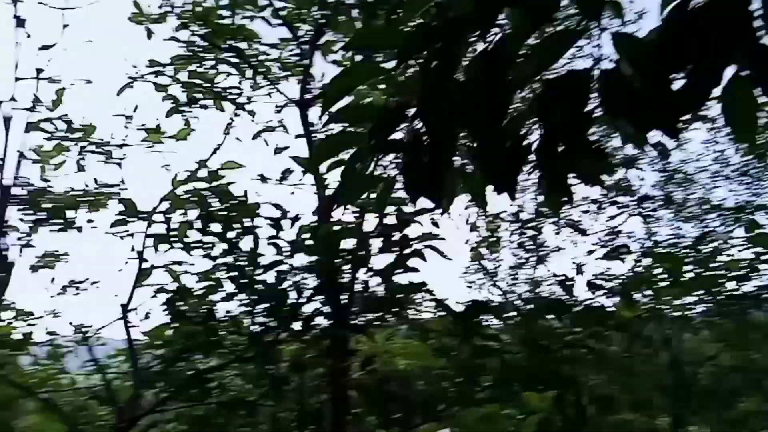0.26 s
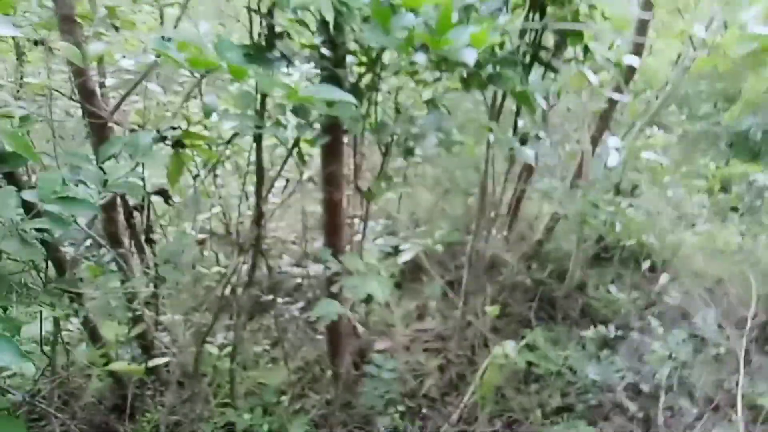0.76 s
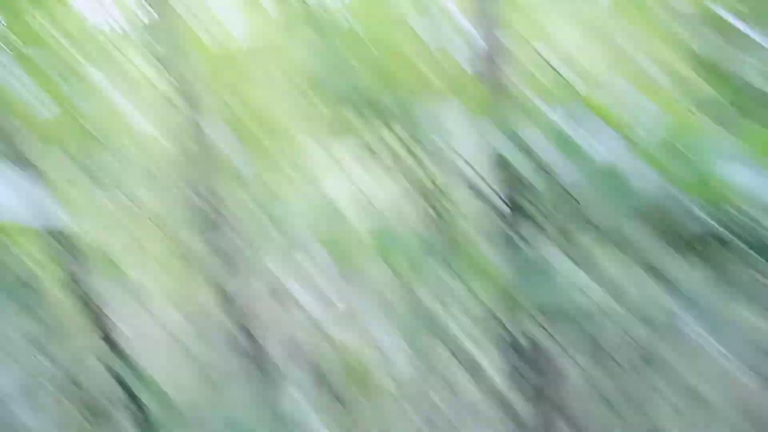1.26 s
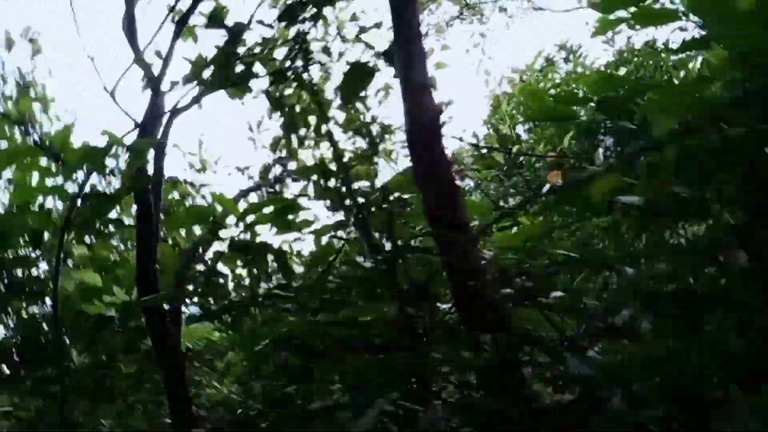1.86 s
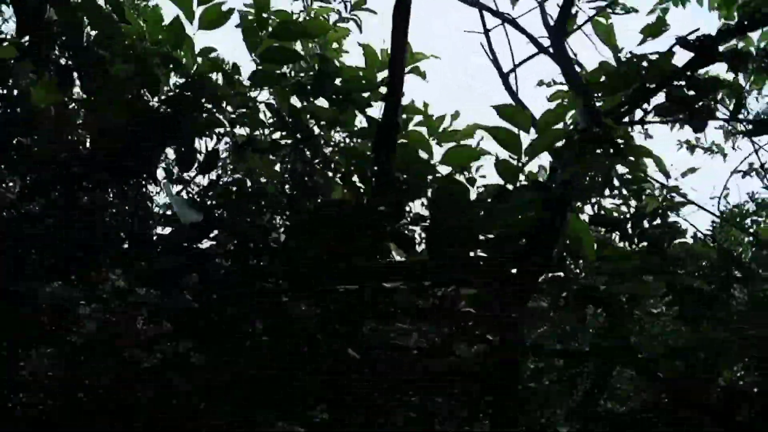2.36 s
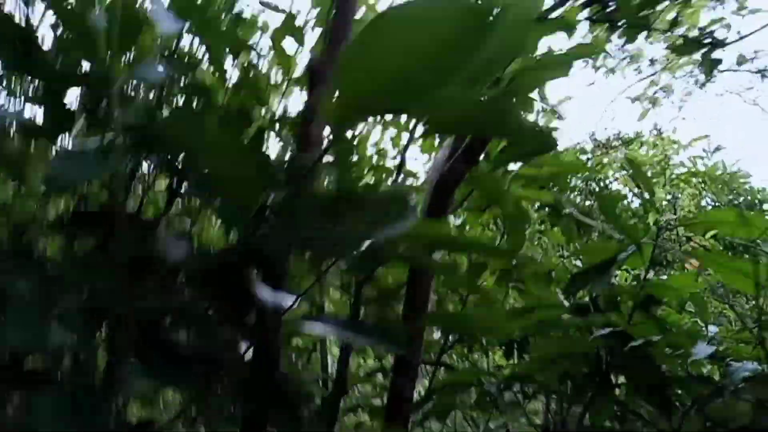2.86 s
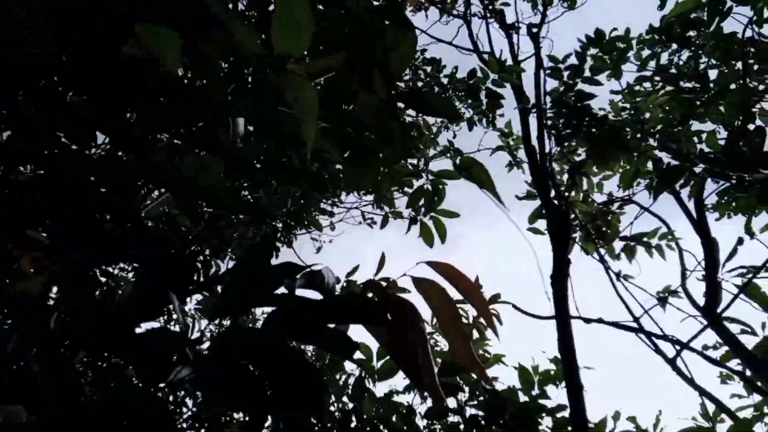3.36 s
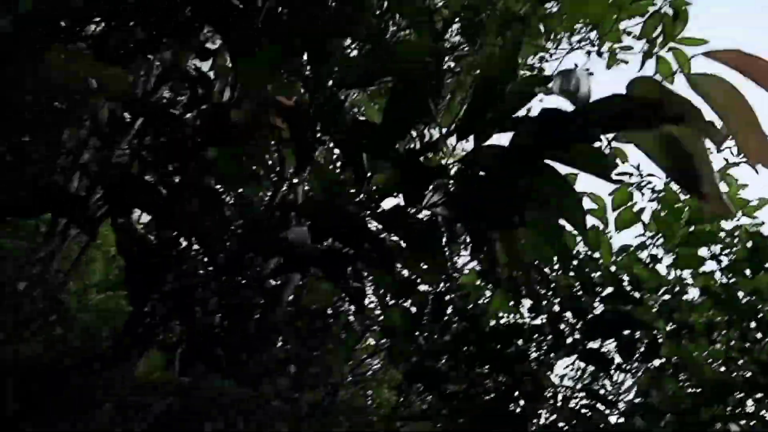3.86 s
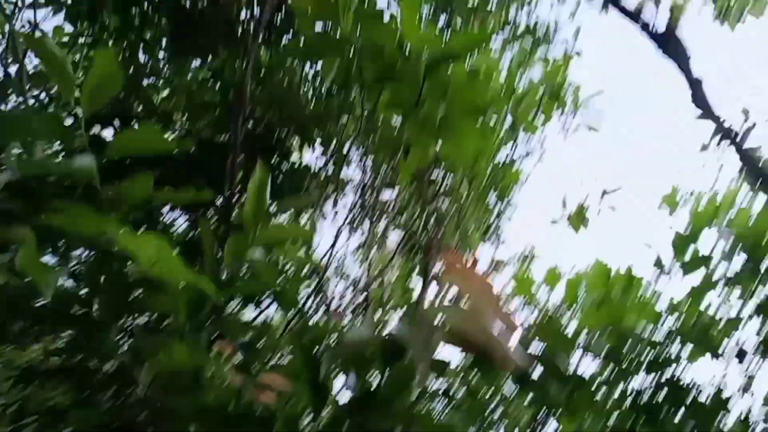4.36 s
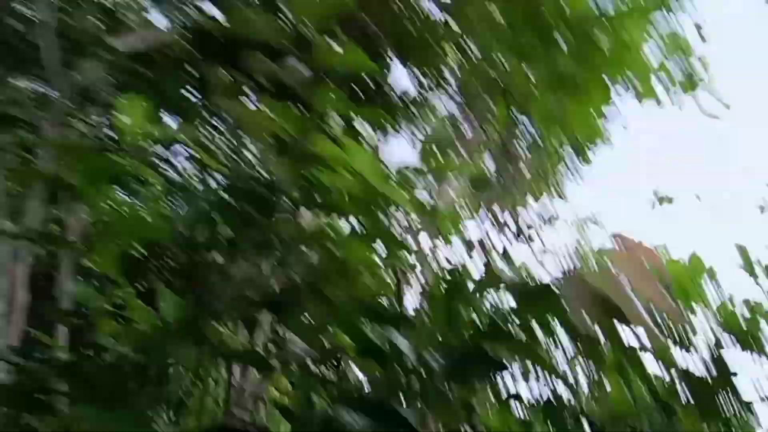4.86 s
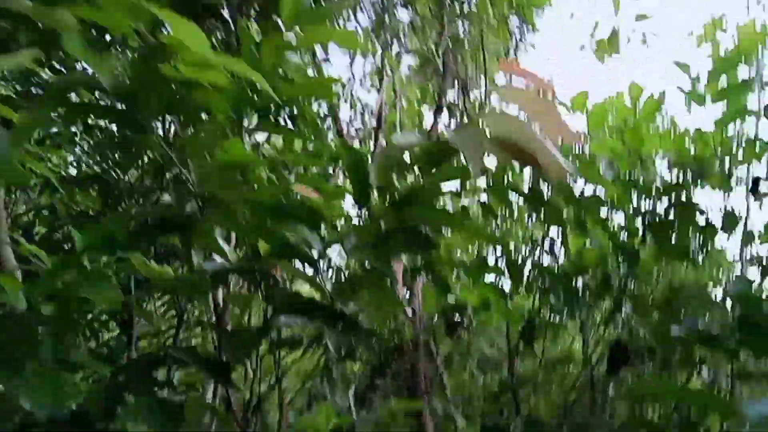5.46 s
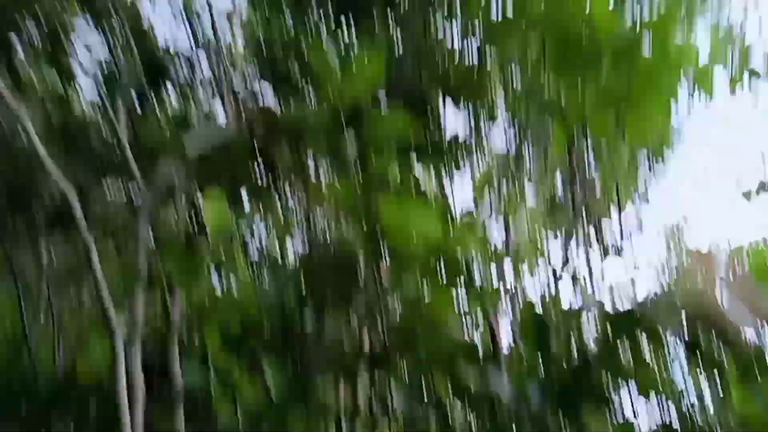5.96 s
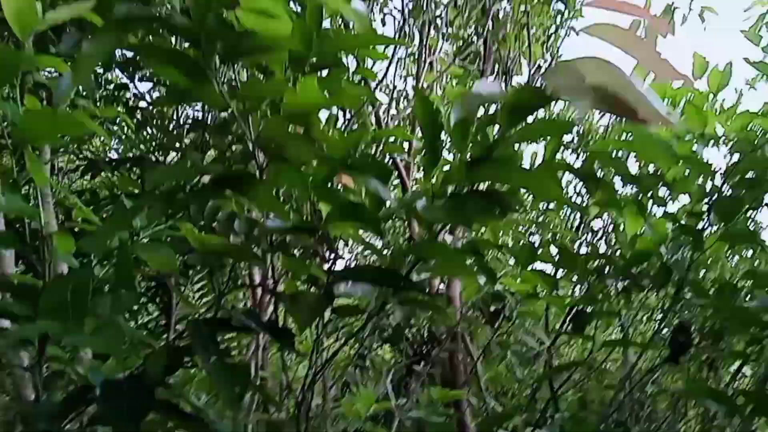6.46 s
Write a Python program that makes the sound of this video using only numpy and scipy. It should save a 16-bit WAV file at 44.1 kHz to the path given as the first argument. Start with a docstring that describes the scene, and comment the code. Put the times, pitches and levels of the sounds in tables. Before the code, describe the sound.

From 0 s, someone pushes through dry undergrowth right beside the microphone. Leaves brush past in soft, crackly sweeps, and twigs snap at 0.3 and 0.6 s. The heaviest crunch comes at about 0.75-0.9 s with a hard crack, followed by sharp snaps near 1.1 s and smaller ones at 1.3-1.9 s. Faint pure whistles sound far off at 1.0 and 1.45 s, then quick soft hoots from 1.7 s as a thin insect buzz starts pulsing. At 2.1 s a close bird gives a brief raspy, downward chirp. After a snap at 2.4 s, movement becomes quiet rustling. Faint chirps chatter around 2.9-3.2 s; whistles return at 3.5 and 4.0 s. The raspy call repeats at 4.3 s, then a twig snaps at 4.5 s and another, weaker, at 4.8 s. Light stirring, whistles near 5.7 and 6.1 s and tiny high pips, clearest at 6.3-6.5 s, finish over faint hiss and low rumble.

```python
"""Someone pushes through dry undergrowth: twigs snap (short decaying rings and a crack), foliage sweeps
past (two coloured crackles, soft and crisp) and litter crunches (swelling fracture showers).
Far whistles (scooped sines), low hoots (arched sines) and a pulsing insect (band noise) join in.
Near 2.1 s and 4.3 s a close bird sings, two rough voices gliding down; after the first song come thin
pips and faint chirps, while the steps turn quiet. Forest hiss and microphone rumble run throughout."""
import sys
import numpy as np
from scipy import signal
from scipy.fft import rfft, irfft
from scipy.io import wavfile

SR = 44100
rng = np.random.default_rng(int(sys.argv[2]) if len(sys.argv) > 2 else 0)


def persist_wave(psi):
    """Save psi, clipped to +-1, as 16-bit WAV."""
    counts = np.round(np.clip(psi, -1, 1) * 32767).astype(np.int16)
    wavfile.write(sys.argv[1], SR, np.atleast_2d(counts).T)


N = 295645
T = np.arange(N) / SR

# sprays of foliage sweeping past:
# (peak time [s], rise from about half [s], relative body level [dB], crisp edge against body [dB])
SWEEPS = [(.14, 0.096, -39.5, -3), (.46, 0.13, -34.5, -6), (.6, 0.026, -31.5, -25),
          (.89, 0.13, -29.5, -6.5), (1.24, 0.048, -45, -1), (1.45, 0.14, -36, 0), (1.74, 0.12, -46, -1.5),
          (2.01, 0.11, -51, -3), (2.29, 0.071, -42.5, 0), (2.48, 0.054, -40.5, -9),
          (2.59, 0.049, -45, -0.5), (2.76, 0.078, -50.5, 2.5), (3.05, 0.096, -53.5, 5),
          (3.64, 0.065, -53.5, 5), (3.75, 0.056, -45.5, -0.5), (3.99, 0.2, -52.5, -3.5),
          (4.55, 0.063, -54.5, 7.5), (5.03, 0.12, -52, 1.5), (5.21, 0.083, -51, -23), (5.41, 0.12, -50, 1),
          (5.69, 0.053, -52, 3), (5.823, 0.031, -60.5, 15), (5.94, 0.023, -61, 15),
          (6.45, 0.21, -55.5, -22)]
# soft rub of leaf on cloth: (frequency [Hz], relative level [dB])
BODY_COLOUR = [(40, -37.5), (220, -6), (420, -9), (650, -3.5), (1000, -4.5), (1400, 1), (2100, -2.5),
               (3200, -9.5), (5000, -32), (15000, -37.5)]
# crisp edge of leaf on leaf: (frequency [Hz], relative level [dB])
EDGE_COLOUR = [(700, -25), (1600, -5.5), (2400, 1.5), (3200, 2.5), (3900, 2), (4500, -7.5), (5200, -15.5),
               (7000, -19), (8700, -18.5), (10500, -39), (15500, -39)]
# bright ticks of dry leaf tips: (frequency [Hz], relative level [dB])
TICK_COLOUR = [(1000, -12), (4000, -3), (8500, 3), (10500, -2), (14000, -4)]
SWEEP_FALL = 1.11  # fall time / rise time
STIR_DB, STIR_EDGE_DB = -60, -61.5  # relative levels of leaves that stir between the sweeps


def brushing():
    """Sprays swell and settle: clumped fractures excite a soft body and crisp edge; firm pushes tick."""
    push, crisp = amp(STIR_DB), amp(STIR_EDGE_DB)
    for peak_s, rise, level_db, edge_db in SWEEPS:
        u = (T - peak_s) / rise
        slope = 1.386 * np.where(u < 0, u, u / SWEEP_FALL)
        swell = 1 / np.cosh(np.clip(slope, -30, 30))
        push = np.hypot(push, amp(level_db) * swell)
        crisp = np.hypot(crisp, amp(level_db + edge_db) * swell)
    clumps = amp(1.75 * wander(N, 40))

    body = colour(crackle(N, per_s=2500, spread_db=3.5, hiss=.5), BODY_COLOUR)
    body = patchy(body, depth_db=4.9, width_hz=350, span=.08)
    edge = colour(crackle(N, per_s=1600, spread_db=4.5, hiss=.55), EDGE_COLOUR)
    edge = patchy(edge, depth_db=2.2, width_hz=600, span=.05)

    # each leaf tip is a burst of noise decaying over 2.8 ms
    tip_clicks = abs(crackle(N, per_s=56, spread_db=0, hiss=0))
    tips = signal.lfilter([1], [1, -np.exp(-1 / (.0028 * SR))], tip_clicks)
    ticks = evened(colour(tips * rng.standard_normal(N), TICK_COLOUR))
    ticks *= np.minimum(push / amp(-39.5), 1)  # held back under a weak push

    soft = amp(3) * body * push
    sharp = (amp(4.5) * edge + amp(-14.5) * ticks) * crisp
    return (soft + sharp) * clumps


# leaf litter giving way:
# (peak time [s], level [dB], rise [s], decay [s], brightness [dB per octave])
LITTER = [(.291, -23.5, 0.0097, 0.0046, -1.5), (.39, -31.5, 0.0026, .004, 8),
          (.485, -20, .016, 0.021, -3.5), (.616, -21.5, .012, 0.0076, -2), (.697, -28, .001, 0.014, -3),
          (.737, -19.5, .001, 0.016, 0.5), (.771, -10.5, 0.0028, 0.0045, 0), (.791, -9, .014, 0.025, -0.9),
          (.839, -9, 0.0099, 0.022, -1.2), (.925, -17.5, 0.0021, 0.02, -0.1),
          (1.069, -19.5, 0.0036, 0.011, -1.5), (1.085, -21, .012, 0.014, -3.5),
          (1.108, -16.5, 0.0042, 0.0091, -1), (1.2905, -22.5, .001, 0.0087, -4.5),
          (1.363, -18.5, 0.0047, 0.014, -4), (1.393, -16.5, 0.00091, 0.0031, 0),
          (1.465, -21.5, .002, 0.0065, 2), (1.502, -19.5, 0.0027, 0.0056, -1.5),
          (1.751, -20, 0.0011, 0.0053, -2), (1.78, -30, 0.018, 0.017, -2), (1.99, -25, 0.0097, 0.015, -2),
          (2.231, -34, 0.00077, 0.0065, 4.5), (2.274, -33, 0.0022, .005, 4),
          (2.325, -32.5, 0.0072, 0.0078, -0.5), (2.361, -29.5, 0.0041, 0.0075, -0.5),
          (2.444, -22, 0.0057, .014, -3.5), (3.197, -33.5, 0.0031, .013, -0.5),
          (4.517, -23, 0.0021, 0.011, -1), (4.818, -31.5, .002, 0.0048, -3)]
# colour of dry leaves, shared with the snaps: (frequency [Hz], relative level [dB])
LEAF_COLOUR = [(25, -52), (110, -16.5), (250, -11), (420, -10.5), (750, -5), (1200, -1.5), (1900, -0.5),
               (3000, -3.5), (3900, -4), (5200, -21.5), (8700, -23), (10500, -32), (15500, -30.5)]


def crunches():
    """Each crush is a swelling, dying shower of fractures in the litter."""
    out = np.zeros(N)
    for peak_s, db, rise, decay, tilt_db in LITTER:
        t = np.arange(-4 * rise, 6 * decay, 1 / SR)
        swell = np.exp(np.minimum(t / rise, -t / decay))
        fractures = crackle(len(t), per_s=5000, spread_db=1.5, hiss=.32)
        shower = evened(colour(fractures * swell, LEAF_COLOUR, tilt_db))
        # the level belongs to the top of the swell
        add(out, peak_s + t[0], amp(db) * shower * np.sqrt(np.mean(swell ** 2)))
    return out


# twigs breaking: (time [s], relative peak level [dB], pitch of the stick [Hz])
TWIGS = [(.047, -21.5, 1530), (0.2728, -13.5, 474), (0.3408, -13, 1070), (.473, -23, 1600),
         (0.6173, -5.5, 1680), (0.6967, -21, 1400), (0.838, -2.5, 1080), (0.923, -9, 1520),
         (1.0781, -7, 1830), (1.1098, -4.5, 2770), (1.3002, -18, 950), (1.3268, -16.5, 1940),
         (1.364, -11, 2080), (1.3914, -10, 2260), (1.465, -15.5, 2600), (1.5021, -16, 2070),
         (1.7144, -15, 1930), (1.7472, -12.5, 1120), (1.8767, -11.5, 2540), (2.439, -12.5, 1730),
         (2.5393, -26, 1610), (4.5137, -11, 1960), (4.6133, -28, 2490), (4.8095, -17.5, 1640),
         (5.3036, -20.5, 3200), (5.63, -29, 3260), (5.6642, -32, 1820)]
RING_CYCLES = 1.15  # cycles in which any stick's ring falls to 1/e


def snaps():
    """A break rings the stick for a few cycles and sheds splinters; a low-pass dulls the ring."""
    out, t = np.zeros(N), np.arange(2048) / SR
    dull = signal.butter(4, 4300, fs=SR, output="sos")
    for s, db, hz in TWIGS:
        ring = np.sin(2 * np.pi * hz * t) * np.exp(-t * hz / RING_CYCLES)
        stick = np.diff(ring * (1 - np.exp(-t / .0002)), prepend=0)
        splinters = .03 * crackle(len(t), per_s=5000, spread_db=3, hiss=.5) * np.exp(-t / .004)
        crack = colour((t == 0) + splinters, LEAF_COLOUR, tilt_db=.5)
        snap = signal.sosfilt(dull, stick / abs(stick).max()) + .5 * crack / abs(crack).max()
        add(out, s, amp(db) * snap / abs(snap).max())
    return out * amp(1.64)


# syllables of the near bird's song:
# (time from song start [s], length [s], first pitch [Hz], last pitch [Hz],
#  bend [+ falls early, - late], relative level [dB], rasp [0-1], second voice / first [ratio])
SONG_SYLLABLES = [(0, .095, 3247, 1987, 5, -23, 0.87, 1.14),
                  (0.098, .036, 3000, 2950, -0.5, -33.5, 1, 0.72),
                  (.12, .115, 2520, 1890, -3, -23, .75, .85)]
# when the song is sung: (time [s])
SONG_TIMES = [2.098, 4.276]


def near_bird():
    """The same raspy song twice, echoed by the trees."""
    out = np.zeros(N)
    for start in SONG_TIMES:
        for s, *shape in SONG_SYLLABLES:
            add(out, start + s, syllable(*shape))
    return out * amp(-.5) + amp(-8.5) * scatter(out, t60=.24, delay=.004)


SYLLABLE_ATTACK_S, RASP_ONSET_S = .0067, .014
SYLLABLE_FADE_DB = -9.5  # drop reached at the end of the note


def syllable(length, first_hz, last_hz, bend, db, rasp, interval):
    """A falling note from both sides of the syrinx; rasp flutters pitch and brings in the second voice."""
    t = np.arange(0, length, 1 / SR)
    u = t / length
    hz = first_hz + (last_hz - first_hz) * np.expm1(-bend * u) / np.expm1(-bend)
    rough = rasp * (1 - np.exp(-t / RASP_ONSET_S))
    step = 2 * np.pi * hz * (1 + .07 * rough * wander(len(t), 520)) / SR
    voice = np.sin(np.cumsum(step)) + .73 * rough * np.sin(np.cumsum(step * interval))
    voice *= amp(2.4 * wander(len(t), 200))
    gate = np.minimum(np.minimum(t, length - t) / SYLLABLE_ATTACK_S, 1)
    return amp(db + SYLLABLE_FADE_DB * u ** 2) * gate * evened(voice)


# faint falling chirps: (time [s], length [s], first pitch [Hz], relative level [dB])
FAR_CHIRPS = [(2.87, 0.056, 3200, -42), (2.947, 0.06, 3200, -40.5), (3.023, 0.032, 3200, -37.5),
              (3.095, 0.055, 3300, -38.5), (3.17, 0.036, 3350, -36), (3.188, 0.0296, 2660, -37),
              (3.4, 0.11, 2500, -53), (3.872, 0.11, 2150, -42.5)]
CHIRP_FALL, CHIRP_RASP = .139, .45  # share of its pitch that a chirp loses; roughness 0-1


def chatter():
    """A loose run of faint falling chirps, half lost in their echo."""
    out = np.zeros(N)
    for s, length, hz, db in FAR_CHIRPS:
        last_hz = hz * (1 - CHIRP_FALL)
        add(out, s, syllable(length, hz, last_hz, bend=1.16, db=db, rasp=CHIRP_RASP, interval=.66))
    return out * amp(-2) + amp(-6) * scatter(out, t60=.25, delay=.008)


# far whistler: (time [s], length [s], pitch approached [Hz],
#                scoop [Hz, + from below, - from above], relative level [dB])
WHISTLE_NOTES = [(.97, 0.15, 2245, 42, -33.5), (1.447, 0.17, 2225, 201.5, -31),
                 (3.531, 0.28, 2300, -37.5, -35.5), (3.959, 0.27, 2225, 341, -35.5),
                 (5.67, .14, 2320, 31.5, -36), (6.058, .24, 2235, 252, -37)]
SCOOP_S = .085  # time constant of a whistle settling on its pitch


def whistler():
    """Pure notes scoop to their pitch, swell and fade, and waver on their way through the trees."""
    out = np.zeros(N)
    for start, length, hz, scoop_hz, db in WHISTLE_NOTES:
        t = np.arange(0, length, 1 / SR)
        pitch = hz - scoop_hz * np.exp(-t / SCOOP_S)
        phase = 2 * np.pi * np.cumsum(pitch * (1 + .013 * wander(len(t), 60))) / SR
        fading = evened(amp(3 * wander(len(t), 35))) * np.sin(np.pi * t / length) ** .7
        add(out, start, amp(db) * np.sin(phase) * fading)
    return out * amp(-2) + amp(-4) * scatter(out, t60=.4, delay=.008)


# runs of far hoots:
# (start time [s], end time [s], rate [hoots per s], nominal pitch [Hz], relative level [dB])
HOOT_RUNS = [(1.725, 2.3, 12.8, 535, -42), (2.79, 3.75, 9.6, 565, -51), (3.77, 3.82, 28, 750, -49)]


def hoots():
    """Quick runs of soft, arched notes, each a little off in time, pitch and level."""
    out, t = np.zeros(N), np.arange(-.05, .05, 1 / SR)
    bell = np.exp(-(t / .0213) ** 2)
    for start, end, per_s, hz, db in HOOT_RUNS:
        for s in np.arange(start, end, 1 / per_s):
            late, sharp, loud = rng.standard_normal(3)
            pitch = hz * (1 + .045 * sharp + .15 * (bell - .8))
            note = bell * np.sin(2 * np.pi * np.cumsum(pitch) / SR)
            add(out, s + .00544 * late, amp(db + 2 * loud) * note)
    return out * amp(-2) + amp(-5) * scatter(out, t60=.25, delay=.008)


# thin pips: (peak time [s], nominal pitch [Hz], relative level [dB])
PIP_NOTES = [(2.65, 7300, -55), (3.305, 7360, -49.5), (3.425, 7400, -52), (3.502, 7840, -40.5),
             (3.875, 7250, -58), (4.151, 7840, -37.5), (4.25, 7850, -40.5), (4.465, 7250, -62),
             (5.697, 7850, -37.5), (6.336, 7880, -32.5), (6.455, 7870, -31.5)]


def pips():
    """Very high, short notes with a slight arch and waver of pitch."""
    out, t = np.zeros(N), np.arange(-.04, .04, 1 / SR)
    bell = np.exp(-(t / .011) ** 2)
    for s, hz, db in PIP_NOTES:
        pitch = hz * (1 + .0091 * (bell - .8) + .0062 * wander(len(t), 200))
        add(out, s + t[0], amp(db + .5) * bell * np.sin(2 * np.pi * np.cumsum(pitch) / SR))
    return out + amp(-17) * scatter(out, t60=.18, delay=.012)


# insect phrases: (start time [s], end time [s])
INSECT_PHRASES = [(1.72, 2.8), (2.47, 3.5), (3.54, 3.94), (4.0, 4.86), (5.02, 5.35), (5.6, 6),
                  (6.028, 6.55)]
# narrow band of its buzz: (frequency [Hz], relative level [dB])
INSECT_COLOUR = [(4700, -43), (5350, -7.5), (5700, 2.5), (6050, -2.5), (6700, -54)]


def insect():
    """A narrow band of buzz, pulsed unevenly in short phrases that swell and fade."""
    out = np.zeros(N)
    for start, end in INSECT_PHRASES:
        t = np.arange(0, end - start, 1 / SR)
        uneven_t = t + .007 * wander(len(t), 12)
        pulses = np.sin(np.pi * 13 * uneven_t) ** 2  # about 13 a second
        add(out, start, pulses * signal.windows.tukey(len(t), .4))
    buzz = colour(rng.standard_normal(N), INSECT_COLOUR)
    return amp(-59.5 + 4.4 * wander(N, 8.9)) * out * buzz


# still forest air: (frequency [Hz], relative level [dB])
AIR_COLOUR = [(25, -2), (120, -6.5), (250, -5), (420, -3), (800, -7), (1400, -4), (2200, 1.5), (3200, 4.5),
              (4200, -4.5), (5000, -9.5), (8000, -20), (10500, -37), (15500, -36)]
# low rumble at the microphone: (frequency [Hz], relative level [dB])
RUMBLE_COLOUR = [(20, -26), (50, -16), (100, -5.5), (145, 2), (230, -3), (310, -11), (420, -34.5),
                 (900, -41)]
# course of the rumble: (time [s], relative level [dB])
RUMBLE_LEVEL = [(0, -53), (1.8, -54), (2.7, -50.5), (2.95, -55.5), (3.2, -52.5), (4.2, -55.5), (4.9, -52.5),
                (5.4, -50.5), (6.7, -57)]


def air():
    """Faint forest hiss and an uneven rumble at the moving microphone, both filtered noise."""
    s, db = np.transpose(RUMBLE_LEVEL)
    rumble = colour(rng.standard_normal(N), RUMBLE_COLOUR)
    rumble = patchy(rumble, depth_db=7, width_hz=175, span=.074) * amp(np.interp(T, s, db) + 4)
    hiss = patchy(colour(rng.standard_normal(N), AIR_COLOUR), depth_db=7.5, width_hz=340, span=.053)
    return rumble + amp(-50.5) * hiss


def crackle(n, per_s, spread_db, hiss):
    """Tiny fractures, their sizes set apart by spread_db, over hiss."""
    size = amp(spread_db * np.minimum(rng.exponential(1, n), 4))
    clicks = size * rng.choice([-1, 1], n) * (rng.random(n) < per_s / SR)
    return evened(evened(clicks) + hiss * rng.standard_normal(n))


def colour(x, points, tilt_db=0):
    """Causal filter from a spectrum and a tilt per octave, so clicks keep their sharp front."""
    size = 4096
    octave = np.log2(np.fft.rfftfreq(size, 1 / SR) + 1)
    f, db = np.transpose(points)
    tilt = tilt_db * np.clip(octave - np.log2(2000), -2, 2.6)  # pivots on 2 kHz
    log_gain = np.log(amp(np.interp(octave, np.log2(f), db) + tilt))
    # folding the cepstrum gives minimum phase
    cepstrum = irfft(log_gain)[:size // 2]
    cepstrum[1:] *= 2
    taps = irfft(np.exp(rfft(cepstrum, size)))
    return signal.fftconvolve(x, taps / np.linalg.norm(taps))[:len(x)]


def patchy(x, depth_db, width_hz, span):
    """Brief chance resonances: the colour shifts in small patches of time (span [s]) and frequency."""
    hz, t, z = signal.stft(x, SR, nperseg=1024, noverlap=768)
    rate = np.fft.fftfreq(len(t), t[1])[None]
    ripple = np.fft.fftfreq(len(hz), hz[1])[:, None]
    smooth = np.exp(-(rate * span) ** 2 - (ripple * width_hz) ** 2)
    field = evened(np.fft.ifft2(np.fft.fft2(rng.standard_normal(z.shape)) * smooth).real)
    gain = evened(amp(depth_db * 2 * np.tanh(field / 2)))
    return signal.istft(z * gain, SR, nperseg=1024, noverlap=768)[1][:N]


def scatter(x, t60, delay):
    """Echoes off trunks and leaves: sparse taps that die away by 60 dB in t60 [s]."""
    t = np.arange(SR // 2) / SR
    hits = rng.standard_normal(len(t)) * (rng.random(len(t)) < 2500 / SR)
    taps = hits * amp(-60 * t / t60) * (t > delay)
    return signal.fftconvolve(x, taps / np.linalg.norm(taps))[:N]


def wander(n, hz):
    """Smooth random drift of rms one, its rates fading out around hz."""
    f = np.fft.rfftfreq(n, 1 / SR)
    return evened(irfft(rfft(rng.standard_normal(n)) * np.exp(-(f / hz) ** 2) * (f > 0), n))


def amp(db):
    """Decibels to gain."""
    return 10 ** (np.asarray(db) / 20)


def evened(x):
    """Scales to an rms of one."""
    return x / np.sqrt(np.mean(x ** 2) + 1e-20)


def add(mix, s, sound):
    """Mixes a sound in at a time [s]."""
    part = mix[max(round(s * SR), 0):][:len(sound)]
    part += sound[:len(part)]


def scene():
    """Close steps with a faint woodland echo, among the animals."""
    steps = crunches() + snaps()
    steps = steps + amp(-15) * scatter(steps, t60=.11, delay=.0019)
    animals = near_bird() + chatter() + whistler() + hoots() + pips() + insect()
    return (brushing() + steps + animals + air())[None]


BAND_LIMIT_HZ = 15900


def record(dry):
    """Clips at full scale, then filters off the top above the band limit."""
    clipped = np.clip(dry, -1, 1)
    lowpass = signal.firwin(511, BAND_LIMIT_HZ, window=("kaiser", 9), fs=SR)
    return signal.oaconvolve(clipped, lowpass[None], "same")


dry = scene()
out = record(dry)
persist_wave(out)
```